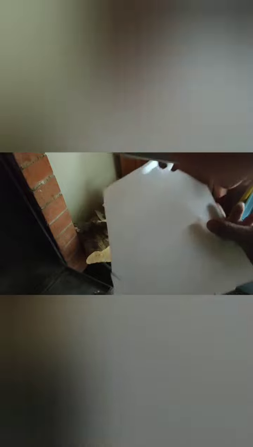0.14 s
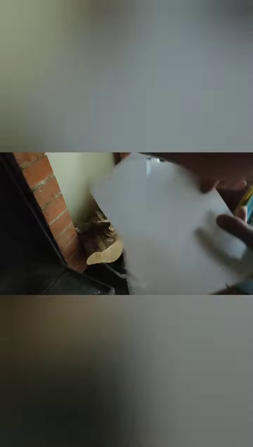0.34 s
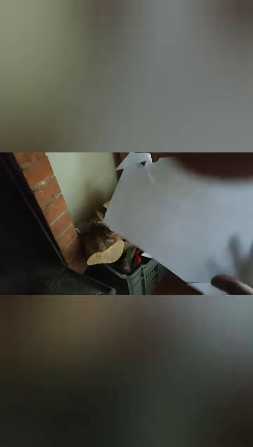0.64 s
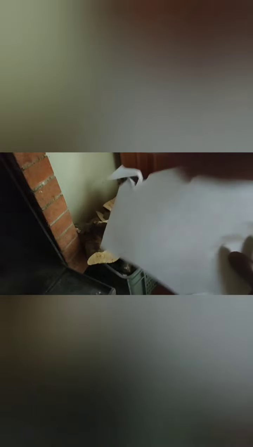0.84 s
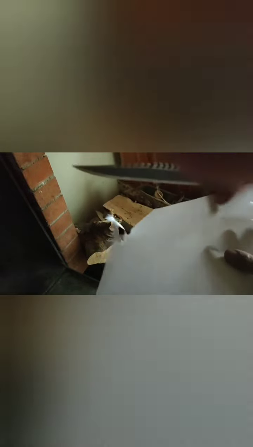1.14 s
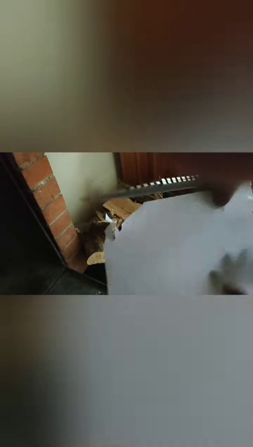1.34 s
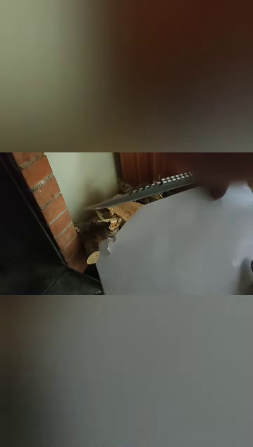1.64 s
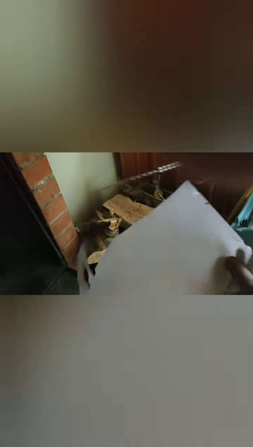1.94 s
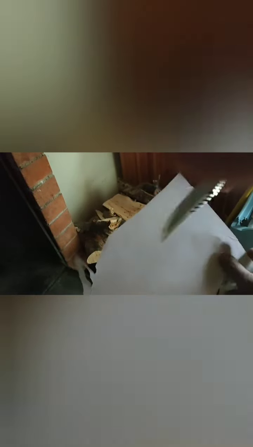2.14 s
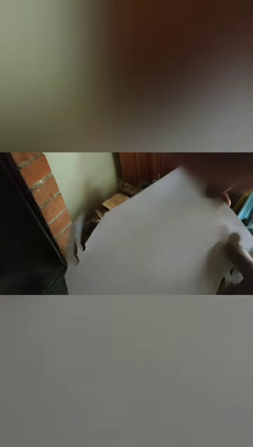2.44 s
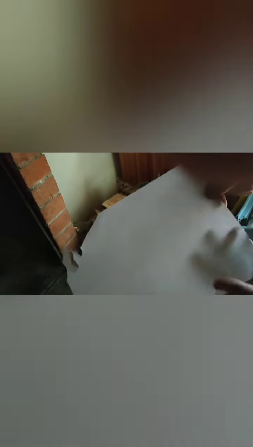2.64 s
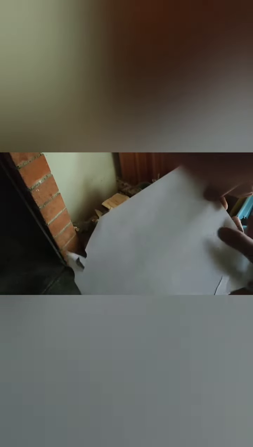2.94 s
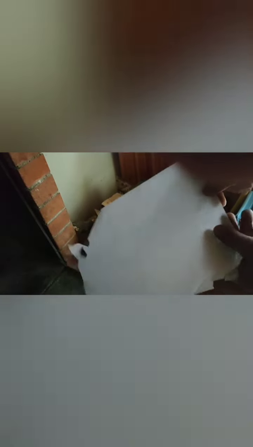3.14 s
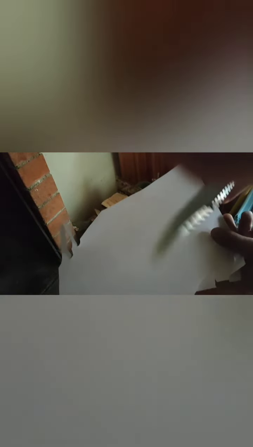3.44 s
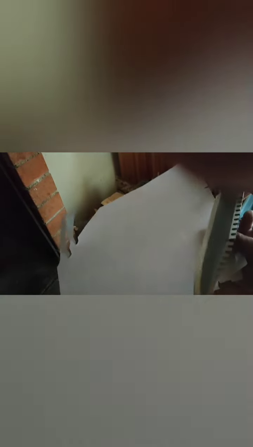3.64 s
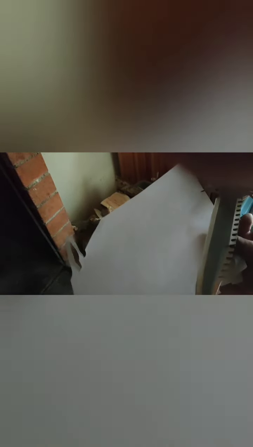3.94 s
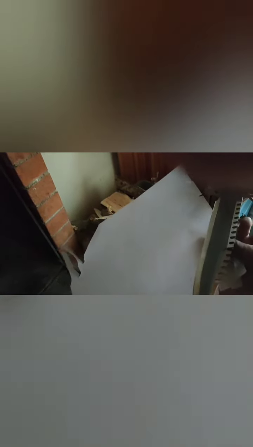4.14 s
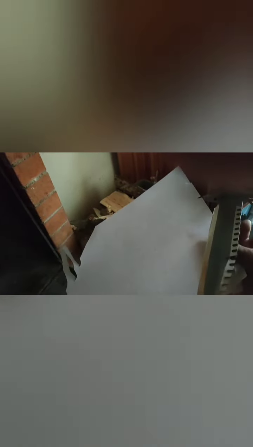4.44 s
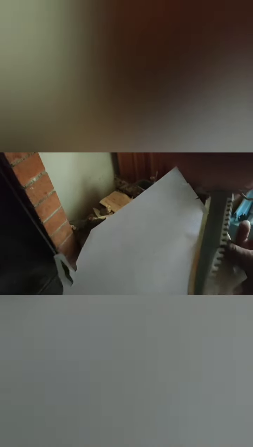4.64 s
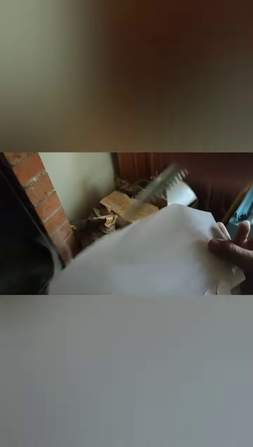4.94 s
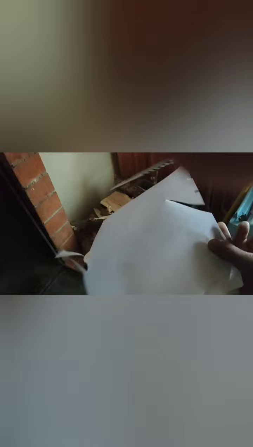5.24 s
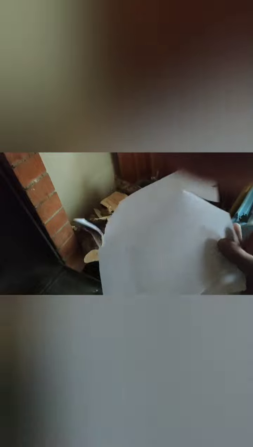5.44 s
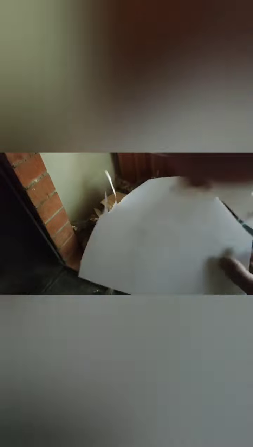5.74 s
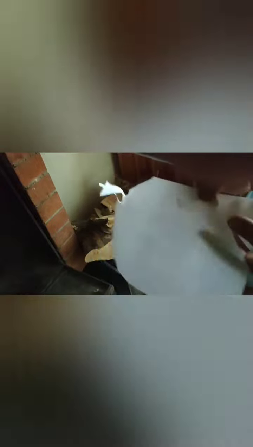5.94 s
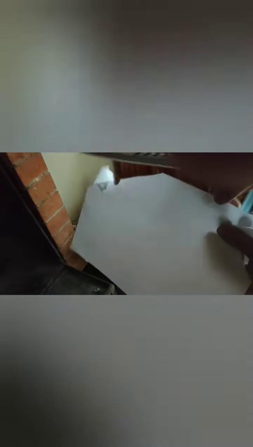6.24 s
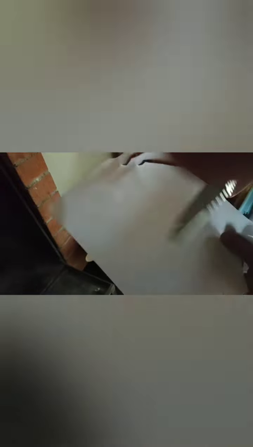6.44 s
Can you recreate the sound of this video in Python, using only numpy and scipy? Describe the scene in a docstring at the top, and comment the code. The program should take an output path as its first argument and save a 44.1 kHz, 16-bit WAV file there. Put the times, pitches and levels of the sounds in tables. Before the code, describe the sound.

Paper handled very near two microphones, with short hard-walled room reflections. Irregular dry rustling and popping creases come first, one pair of pops clearly louder. Handling thins out to tiny ticks and a faint steel-on-paper hiss. A knife then bites and tears through for under half a second, bright and gritty over a fluttering flap. After a light lull, rustling swells into violent cracking snaps.

```python
"""A small brick room: a knife works at the edge of a hand-held sheet of paper, close to two microphones.
Bent, the sheet crackles and ticks; slipping, it hisses: both are coloured random clicks.
Creases snap as resonant pulses with a noisy rattle; crumpling parts are brief clouds of clicks.
The blade glides in a thin hiss; one long slice tears fibres in a swelling rasp over a ringing flap.
At the end the blade catches and jerks the sheet: a cluster of loud snaps."""
import sys
import numpy as np
from scipy import signal
from scipy.fft import rfft, irfft, next_fast_len
from scipy.io import wavfile

SR = 44100
rng = np.random.default_rng(int(sys.argv[2]) if len(sys.argv) > 2 else 0)


def write(x):
    x = np.atleast_2d(x).T
    wavfile.write(sys.argv[1], SR, np.round(np.clip(x, -1, 1) * 32767).astype(np.int16))


N = 290178
TIME = np.arange(N) / SR
PATCHES = 4  # parts of the sheet that radiate separately


def from_db(db):
    """Decibels to gain."""
    return np.exp(np.asarray(db) * (np.log(10) / 20))


def rms_one(x):
    """Scale to unit rms."""
    return x / np.sqrt(np.mean(x ** 2) + 1e-20)


def on_bins(points, size):
    """Read a table over log frequency at the FFT bins of a signal of this size."""
    hz, value = np.transpose(points)
    bins_hz = np.fft.rfftfreq(size, 1 / SR)
    return np.interp(np.log(bins_hz + 1), np.log(hz), value)


def coloured(x, colour):
    """Filter by a table of spectral gains; rms 1."""
    size = next_fast_len(N, True)
    gain = from_db(on_bins(colour, size)).astype(np.float32)
    spectrum = rfft(x.astype(np.float32), size) * gain
    return rms_one(irfft(spectrum, size)[..., :N])


def drift(rate_hz):
    """Smooth random curve with rate_hz new values a second; rms 1."""
    steps = rng.standard_normal(8192)
    return rms_one(np.interp(TIME * rate_hz, np.arange(len(steps)), steps))


def grains(per_s, spread_db):
    """Random clicks, per_s over the whole sheet, most weak and a few strong; rms 1."""
    chance, size = rng.random((2, PATCHES, N), dtype=np.float32)
    born = chance < per_s / SR / PATCHES
    size = 2 * size[born] - 1
    out = np.zeros((PATCHES, N), np.float32)
    out[born] = np.sign(size) * from_db(-spread_db * np.log(np.abs(size) + .02))
    return rms_one(out)


def resonator(w, damping):
    """Band-pass coefficients for a resonance at w rad/sample."""
    a = np.sin(w) * damping / 2
    return [a, 0, -a], [1 + a, -2 * np.cos(w), 1 - a]


def panel(x, hz, damping, body, reach):
    """Patch of paper: one damped resonance minus the push of the whole sheet, dull above reach * hz."""
    patch = signal.lfilter(*resonator(2 * np.pi * min(hz, SR / 4) / SR, damping), x)
    sheet = signal.lfilter(*signal.butter(2, [125, 500], "band", fs=SR), x)
    return signal.lfilter(*signal.butter(2, min(reach * hz, SR / 3), fs=SR), patch - body * sheet)


def add(out, s, sound):
    """Mix a short sound in from time s."""
    at = int(np.clip(round(s * SR), 0, N - 1))
    out[at:at + len(sound)] += sound[:N - at]


ATTACK_S, RELEASE_DB_PER_S = 0.001, 377.5


def swell(start_s, rise_s, fall_s, peak_db, swell_db, hold_s=0):
    """Gain of one movement: quick attack, swell_db up to the peak, hold, as much down, release."""
    t = TIME - start_s
    turns_s = np.cumsum(np.abs([0, rise_s, hold_s, fall_s]))
    db = np.interp(t, turns_s, [-swell_db, 0, 0, -swell_db])
    db = db - RELEASE_DB_PER_S * np.clip(t - turns_s[-1], 0, 1)
    return from_db(peak_db + db) * np.clip(t / ATTACK_S, 0, 1)


# still room: f/Hz, gain/dB
HUSH_COLOUR = [(25, -2), (60, 0), (170, 3), (350, 0), (1000, -8), (3000, -13), (6500, -16), (8000, -25),
               (15000, -30)]
HUSH_DB = -85


def hush():
    """Still room: faint coloured noise, independent at each microphone."""
    return from_db(HUSH_DB) * coloured(rng.standard_normal((2, N)), HUSH_COLOUR)


TICKS_PER_S, TICK_HZ, TICK_DB = 260, 1626, -5  # total rate, middle pitch, level re crackle
TICK_SIZES, TICK_OCTAVES = 5, 0.97  # pitches span +-TICK_OCTAVES


def ticks():
    """Small creases of several sizes flip at random, each exciting a panel resonance; rms 1."""
    total = 0
    for hz in TICK_HZ * 2 ** (TICK_OCTAVES * np.linspace(-1, 1, TICK_SIZES)):
        flips = grains(TICKS_PER_S / TICK_SIZES, spread_db=1.0) + 1e-18  # offset avoids denormals
        total = total + rms_one(panel(flips, hz, damping=0.36, body=0.087, reach=1.9))
    return rms_one(total)


GRIP_FROM_S = .285  # from here the gripping fingers keep the sheet faintly astir

# sheet bent or turned: start t/s, rise/s, fall/s, peak level/dB before trim, swell/dB (negative: dip)
BENDS = [(0, 0.014, 0.048, -62, -9), (0.287, 0.1, 0.2, -52, 9), (0.723, 0.17, 0.22, -48.5, 14.5),
         (1.197, 0.037, 0.34, -59, 2.5), (1.629, 0.19, 0.048, -42, 17), (1.887, 0.049, 0.19, -48, 18.5),
         (2.11, 0.0065, 0.19, -65.5, 10), (2.48, 0.1, 0.18, -51.5, 16), (2.67, 0.087, 0.053, -57, 14),
         (2.973, 0.25, 0.2, -56.5, 6.5), (3.64, 0.016, .04, -81, -3), (3.772, 0.033, 0.1, -75, 7),
         (3.97, 0.13, 0.15, -72.5, 13), (4.3, 0.156, 0.21, -79, 6), (5.08, .01, 0.15, -71, 4),
         (5.236, 0.038, 0.076, -60, 13), (5.37, 0.14, 0.11, -78.5, 0), (5.729, 0.08, 0.023, -59.5, 4.5),
         (5.86, 0.424, 0.074, -45.5, 29), (6.409, 0.084, 0.062, -39, 8)]
# bending fibres: f/Hz, gain/dB
FLEX_COLOUR = [(30, -37), (70, -8.5), (140, 1), (220, 1.5), (350, 1), (600, -0.5), (1000, 0), (2000, -5),
               (3200, -6.5), (5000, -13), (8000, -26.5), (15000, -44)]
BEND_TRIM_DB, GRIP_CRACKLE_DB, CLUMP_DB = -1.94, -90.94, 2.5


def bending(stick_slip):
    """Bending fibres crackle in clumps, and small creases tick."""
    effort = from_db(BEND_TRIM_DB) * sum(swell(*row) for row in BENDS)
    effort = effort + from_db(GRIP_CRACKLE_DB) * (TIME > GRIP_FROM_S)
    clicks = grains(per_s=1400, spread_db=4.5) * from_db(CLUMP_DB * stick_slip)
    return effort * (coloured(clicks, FLEX_COLOUR) + from_db(TICK_DB) * ticks())


# slips in the fingers or along the blade: start t/s, rise/s, fall/s, peak level/dB before trim,
# swell/dB (negative: dip)
SLIPS = [(0, 0.0032, 0.024, -57.5, -1.5), (0.283, 0.19, 0.045, -50.5, 8.5), (.6, 0.0177, 0.17, -89, -1),
         (.72, 0.19, 0.032, -57, 13.5), (.95, 0.097, 0.037, -59, 18), (1.15, 0.26, 0.18, -49.5, 23.5),
         (1.602, 0.22, 0.39, -48, 27.5), (2.09, 0.2, 0.053, -60.5, 14), (2.483, 0.058, 0.13, -58, 13),
         (2.65, 0.13, 0.031, -66, 11.5), (2.86, 0.16, 0.22, -62, 23.5), (3.11, .14, 0.067, -57.5, 23),
         (3.355, 0.0074, 0.062, -58, 7.5), (3.645, 0.009, 0.031, -73, 6), (3.772, 0.11, .008, -77.5, 0),
         (5.089, 0.075, .008, -54, 9), (5.26, 0.035, 0.034, -67.5, 6), (5.37, .01, 0.17, -71, 4),
         (5.515, 0.048, 0.22, -66.5, 3.5), (5.73, 0.086, 0.024, -52, 14), (5.87, 0.1, 0.86, -58, 8.5),
         (6.21, 0.054, 0.021, -47, 13.5), (6.285, 0.0084, 0.012, -30, 20), (6.45, 0.031, 0.02, -41.5, 10)]
# slip hiss: f/Hz, gain/dB
SLIDE_COLOUR = [(200, -15.5), (900, -9.5), (2500, -1), (4000, -2.5), (6500, -6), (8000, -15), (11000, -14),
                (13000, -21), (15500, -21)]
SLIP_TRIM_DB, GRIP_HISS_DB, STICK_DB = 1.0, -88, 1.5


def slipping(stick_slip):
    """Sliding paper sticks and slips in dense small clicks: a hiss."""
    speed = from_db(SLIP_TRIM_DB) * sum(swell(*row) for row in SLIPS)
    speed = speed + from_db(GRIP_HISS_DB) * (TIME > GRIP_FROM_S)
    clicks = grains(per_s=5600, spread_db=1.5) * from_db(STICK_DB * stick_slip)
    return speed * coloured(clicks, SLIDE_COLOUR)


def handling():
    """Bending and slipping share one random unevenness."""
    stick_slip = drift(140)
    return bending(stick_slip) + slipping(stick_slip)


# main creases popping over: t/s, peak level/dB before trim, f/Hz, rattle level/dB re peak before trim
SNAPS = [(.0565, -37, 3930, -22), (.0594, -38, 2040, -26), (.0785, -36.5, 1040, -1.5),
         (.3258, -29, 2100, -3), (.3298, -31, 1900, -5), (.371, -28.5, 2150, -7), (.4729, -23.5, 2200, -8),
         (.5405, -34.5, 1600, -5), (.561, -45.5, 1450, 1), (.7249, -37.5, 2050, -22),
         (.8775, -29.5, 1180, -8.5), (.887, -27.5, 2100, -5), (1.042, -31, 1115, -16),
         (1.086, -40, 2400, -12.5), (1.2065, -32.5, 1430, -9.5), (1.227, -38, 2170, -3.5),
         (1.4072, -44, 1060, -12), (1.5296, -31, 1910, -12.5), (1.7037, -28.5, 2060, -17),
         (1.7352, -35.5, 2330, 0), (1.7682, -21.5, 1680, -15), (1.7859, -10.5, 1950, -15),
         (1.8012, -20.5, 1490, -5), (1.8976, -27, 1100, -8.5), (1.9476, -31, 1510, -5.5),
         (2.0732, -12.5, 2000, -36), (2.5271, -32.5, 1730, -9), (2.5828, -21, 2230, -8.5),
         (2.7635, -37, 2600, -13), (2.9949, -36, 1430, -10.5), (3.073, -36, 2400, -13),
         (3.095, -42, 880, -5.5), (3.1318, -40, 4000, -27), (3.137, -43, 3420, 1),
         (3.151, -30.5, 1700, -6.5), (3.2098, -19, 1570, -7.5), (3.3751, -30, 4500, -12),
         (3.4139, -33.5, 2410, -21), (3.456, -44, 3000, -18), (3.849, -53.5, 3100, -2.5),
         (3.9776, -50, 1340, -11), (4.088, -33.5, 1250, -11), (4.5998, -44, 1384, -4.5),
         (5.248, -53, 1220, -20), (5.265, -38, 1590, -4), (5.3755, -47, 5270, -2.5),
         (5.3784, -38, 2020, -6), (6.1125, -39, 1200, -3), (6.1503, -32, 1130, -6.5),
         (6.1765, -33, 1100, -10), (6.185, -27.5, 1740, -7.5), (6.2155, -32, 1040, -6.5),
         (6.222, -30.5, 2420, -7.5), (6.2359, -28, 1430, -10), (6.26, -31, 2300, -15),
         (6.279, -16, 1860, 0), (6.2885, -7, 3220, -13), (6.29, -3, 2420, -9.5), (6.295, -20.5, 1970, -1),
         (6.34, -21, 1460, -5), (6.372, -37, 2100, -16), (6.4078, -37, 5600, -13), (6.41, -4.5, 2120, -11),
         (6.4157, -3.5, 1930, -13.5), (6.4865, -14, 1660, -9), (6.495, -14, 2330, -3.5),
         (6.4975, -11.5, 2070, -11)]
SNAP_TRIM_DB, RATTLE_TRIM_DB = -2.5, 3.5
GIVE_S, RATTLE_S = .0003, .002  # time constants of creak and rattle


def snaps(size=2048):
    """A crease creaks, flips with one sharp pulse in one patch, and rattles in all patches."""
    out = np.zeros((PATCHES, N))
    lead = size // 8
    t = TIME[:size] - TIME[lead]
    shape = np.exp(-np.abs(t) / np.where(t < 0, GIVE_S, RATTLE_S)) / np.sqrt(PATCHES)
    for k, (s, db, hz, after_db) in enumerate(SNAPS):
        peak_db = db + SNAP_TRIM_DB
        # push and, a quarter period later, pull
        flip = signal.unit_impulse(size, lead) - signal.unit_impulse(size, lead + int(SR / hz / 4))
        pulse = panel(flip, hz, damping=3.0, body=3.9, reach=1.57)
        add(out[k % PATCHES], s + t[0], from_db(peak_db) * pulse / np.abs(pulse).max())
        noise = rng.standard_normal((PATCHES, size))
        rattles = rms_one(panel(noise, hz, damping=0.87, body=0.17, reach=2.3))
        for patch, rattle in zip(out, rattles):
            add(patch, s + t[0], from_db(peak_db + after_db + RATTLE_TRIM_DB) * shape * rattle)
    return out


# parts of the sheet crumpling: middle t/s, level/dB before trim, f/Hz, half length/s before scaling
BUCKLES = [(.082, -48.5, 755, 0.0059), (.104, -62, 900, .006), (.134, -58, 850, 0.0052),
           (.385, -44, 1700, 0.03), (.881, -37, 1400, 0.014), (.885, -53, 170, 0.023),
           (.998, -43, 1420, 0.0083), (1.044, -43, 1256, 0.019), (1.085, -49, 1700, 0.0075),
           (1.222, -49, 1400, 0.017), (1.26, -49, 1380, 0.023), (1.404, -39.5, 867, 0.0026),
           (1.474, -46.5, 2600, 0.02), (1.8, -36, 1600, 0.0071), (1.805, -49, 191, 0.023),
           (1.902, -43, 980, 0.0068), (2.029, -44, 1910, 0.0066), (2.255, -56.5, 1920, 0.0095),
           (2.322, -59, 1920, 0.0084), (2.415, -78, 706, 0.0065), (2.562, -47.5, 2600, 0.0061),
           (2.595, -44, 1900, 0.01), (2.68, -47.5, 1300, 0.011), (2.728, -46, 990, 0.0061),
           (3.155, -42.5, 1470, 0.0065), (3.236, -40.5, 1230, 0.0048), (3.303, -51, 1305, 0.013),
           (3.331, -57, 1390, 0.0044), (3.374, -63, 6500, 0.016), (3.657, -56.5, 2210, 0.0077),
           (3.788, -61.5, 1500, 0.02), (3.857, -62, 2550, 0.004), (3.9, -62, 2790, 0.0063),
           (4.095, -63.5, 456, 0.0089), (4.258, -70, 1900, 0.018), (4.604, -58.5, 330, 0.0088),
           (4.855, -33, 2300, .012), (4.94, -35, 4300, 0.0088), (4.986, -31, 2800, 0.0021),
           (5.534, -50, 1940, 0.0098), (6.068, -51, 910, 0.0071), (6.117, -45.5, 1130, 0.0064),
           (6.168, -46.5, 1300, 0.011), (6.335, -31.5, 1350, 0.036), (6.438, -36, 1180, 0.026),
           (6.486, -26, 1550, 0.0075), (6.505, -37, 1700, 0.0047)]
BUCKLE_TRIM_DB, LENGTH_SCALE, JERK_DB, FACET_OCTAVES = -2.5, 0.66, 2.0, 0.41


def buckles():
    """A crumple is a swelling, fading, jerky cloud of clicks; each patch folds at its own pitch."""
    out = np.zeros((PATCHES, N))
    clicks = grains(per_s=6500, spread_db=2.5) * from_db(JERK_DB * drift(260))
    ratios = 2 ** (FACET_OCTAVES * np.linspace(-1, 1, PATCHES))
    for s, db, hz, half_s in BUCKLES:
        near = slice(max(0, int((s - .08) * SR)), int((s + .08) * SR))
        shape = 1 / np.cosh(np.clip((TIME[near] - s) / (LENGTH_SCALE * half_s), -20, 20))
        facets = []
        for x, ratio in zip(clicks, ratios):
            facet = panel(x[near], hz * ratio, damping=0.87, body=0.22, reach=2.28)
            facets.append(facet / np.sqrt(ratio))
        out[:, near] += from_db(db + BUCKLE_TRIM_DB) * shape * rms_one(np.array(facets))
    return out / np.sqrt(PATCHES)


# edge gliding on the taut sheet without biting: start t/s, rise/s, fall/s, peak level/dB, swell/dB
GLIDES = [(3.9, .19, 0.14, -68, 12.5), (4.28, 0.11, 0.49, -64.5, 34)]
# steel on paper edge: f/Hz, gain/dB
GLIDE_COLOUR = [(150, -4.5), (400, -11), (1000, -7), (2500, -4), (4200, 0), (5400, 2), (6800, -7),
                (8000, -21.5), (11500, -16.5), (15000, -27)]


def gliding():
    """Smooth steel on the paper's edge: a thin, even hiss of dense clicks."""
    clicks = grains(per_s=6700, spread_db=0.5)
    return sum(swell(*row) for row in GLIDES) * coloured(clicks, GLIDE_COLOUR)


BITE_S = 4.615  # the edge bites and the long slice starts
FLAP_HZ, FLAP_OCTAVES_PER_S, FLAP_DAMPING = 6400, 3.1, 0.33  # pitch at the bite, its fall


def flap_ring(x, size=256):
    """The flap's broad resonance sinks as the cut lengthens; rms 1."""
    out, state = np.zeros(x.shape), np.zeros((PATCHES, 2))
    for i in range(0, N, size):
        hz = FLAP_HZ * 2 ** (-FLAP_OCTAVES_PER_S * np.clip(TIME[i] - BITE_S, 0, 1))
        b, a = resonator(2 * np.pi * hz / SR, FLAP_DAMPING)
        out[:, i:i + size], state = signal.lfilter(b, a, x[:, i:i + size], zi=state)
    return rms_one(out)


# tearing fibres: f/Hz, gain/dB
TEAR_COLOUR = [(100, -51), (400, -15), (680, -14), (1050, -0.5), (1500, -3.5), (2200, 1.5), (3100, -5.5),
               (4500, -7), (6500, -22.5), (8000, -48), (15000, -52)]
# blade friction: f/Hz, gain/dB
RUB_COLOUR = [(800, -65), (3500, 14), (5000, 7.5), (7000, 5.5), (8000, -24), (10500, -5.5), (12000, -27),
              (15000, -12)]
# shuddering flap: f/Hz, gain/dB
SHUDDER_COLOUR = [(25, -30), (70, -13), (150, 2.5), (250, -1), (340, 6), (480, 6), (800, 8), (1500, -14)]
FLAP_DB, CATCH_DB, SNAG_DB, SINK_IN_S = -2.5, 1.5, 0.26, 0.029  # FLAP_DB re tearing


def slicing():
    """Fibres break unevenly, the blade sinks in and rubs, the flap rings and shudders: (edge, flap)."""
    # friction peaks first, then tearing, last the freed flap
    rub = swell(BITE_S, rise_s=0.225, fall_s=.14, peak_db=-37.5, swell_db=28, hold_s=0.135)
    tear = swell(BITE_S, rise_s=0.265, fall_s=0.13, peak_db=-30.2, swell_db=37, hold_s=0.1)
    shudder = swell(BITE_S, rise_s=.32, fall_s=.13, peak_db=-39.5, swell_db=31, hold_s=.06)
    catching = from_db(CATCH_DB * drift(320) + SNAG_DB * drift(70))
    breaks = grains(per_s=3200, spread_db=1.2) * catching
    friction = grains(per_s=20000, spread_db=4.0) * catching
    fibres = tear * (coloured(breaks, TEAR_COLOUR) + from_db(FLAP_DB) * flap_ring(friction))
    sink_in = np.clip((TIME - BITE_S) / SINK_IN_S, 0, 1)
    blade = rub * sink_in * coloured(friction, RUB_COLOUR)
    return fibres + blade, shudder * coloured(friction, SHUDDER_COLOUR)


# likeness of the echo at the two microphones: f/Hz, likeness/0-1
ECHO_LIKENESS = [(100, 0.92), (350, 0.8), (700, 0.43), (1500, 0.088), (4000, 0.061), (15000, 0)]


def echoes(t60_s, low_t60_s, size=32768):
    """Dense decaying reflections at two microphones, alike and longer in the bass; spectra."""
    t = TIME[:size]
    noise = rng.standard_normal((2, size))
    low = signal.sosfilt(signal.butter(2, 450, fs=SR, output="sos"), noise)
    tail = (noise - low) * from_db(-60 * t / t60_s) + low * from_db(-60 * t / low_t60_s)
    tail = tail * (t > .001)
    mid, side = rfft(rms_one(tail) / np.sqrt(size))
    alike = np.clip(on_bins(ECHO_LIKENESS, size), -1, 1)
    return (np.sqrt(1 + alike) * mid + np.sqrt(1 - alike) * side * [[1], [-1]]) / np.sqrt(2)


# echo colour: f/Hz, gain/dB
ROOM_COLOUR = [(50, 3.5), (110, -3.5), (165, 2), (280, 0.5), (345, 3), (430, -3), (520, -1.5), (660, 3.5),
               (1000, 4), (3000, 3), (7000, 4), (15000, -11.5)]
# resonances of the corner between the brick walls: f/Hz, level/dB, width/Hz
ROOM_MODES = [(155, 5.5, 25), (234, 6.5, 48), (342, 8, 28.4), (507.3, 4, 33), (800, 3.5, 43), (997, 4, 30),
              (1181, 2.5, 31), (1760, -13.5, 270)]
NEAR_DB, FAR_DB = -5.0, -7.0  # before ROOM_COLOUR


def room(lag_s, polarity, size=32768):
    """Left lags right; hands and sheet echo briefly, walls longer, the corner rings: (direct, echo)."""
    hz = np.fft.rfftfreq(size, 1 / SR)
    direct = np.exp(-2j * np.pi * hz * np.array([[lag_s], [0]]))
    near = from_db(NEAR_DB) * echoes(t60_s=0.062, low_t60_s=0.14)
    far = from_db(FAR_DB) * echoes(t60_s=0.15, low_t60_s=0.35)
    ringing = 0
    for mode_hz, db, width_hz in ROOM_MODES:
        loss = 1j * hz * width_hz
        ringing = ringing + from_db(db) * loss / (mode_hz ** 2 - hz ** 2 + loss)
    return direct, (near + far) * from_db(on_bins(ROOM_COLOUR, size)) + polarity * ringing


def lean(db):
    """Gains of the two microphones for a sound db louder on the left."""
    return from_db(db * np.array([[.5], [-.5]]))


# microphone balance: f/Hz, left minus right level/dB
BALANCE = [(100, -.7), (520, -2.4), (650, 0.5), (900, 2.1), (1030, 5.8), (1350, 5.95), (1900, 2.9),
           (3000, 5.46), (3600, 4.3), (4400, 1), (6300, -1.3), (8300, 2.2), (15000, 0.94)]


def heard(x, paths, size=32768):
    """Convolve a sound with its paths to the two microphones, each with its own colour."""
    lead = size // 256  # room for the filter's pre-ringing
    response = np.roll(irfft(paths * lean(on_bins(BALANCE, size))), lead, axis=1)
    wet = signal.fftconvolve(x[None].astype(np.float32), response.astype(np.float32), axes=1)
    return wet[:, lead:lead + N]


LEAST_LAG_S, MOST_LAG_S, EDGE_LAG_S = .00005, 0.00019, .00009  # delay of the left microphone
EDGE_LEAN_DB, EDGE_LEAN_FALL_DB_PER_S = 6, 14.5  # the cut starts on the left and moves past the middle
SNAP_LEAN_DB, SNAP_ECHO_DB = 1.0, -5.5  # snaps lie further left; echo re that of a rustle


def scene():
    """Each patch of the wide sheet reaches the microphones by its own paths, over the hush."""
    out = hush()
    edge, flap = np.array(slicing()) / np.sqrt(PATCHES)
    rustle = (handling() + gliding()) / np.sqrt(PATCHES) + flap + buckles()
    cracks = snaps()
    cut_s = np.clip(TIME - BITE_S, 0, .5)
    travel = lean(EDGE_LEAN_DB - EDGE_LEAN_FALL_DB_PER_S * cut_s)
    for k, lag_s in enumerate(np.linspace(LEAST_LAG_S, MOST_LAG_S, PATCHES)):
        polarity = (-1) ** k
        direct, echo = room(lag_s, polarity)
        out = out + heard(rustle[k], direct + echo)
        # a flipping crease beams at the microphones and stirs the room less
        out = out + lean(SNAP_LEAN_DB) * heard(cracks[k], direct + from_db(SNAP_ECHO_DB) * echo)
        # tearing comes from one point, under the blade
        out = out + travel * heard(edge[k], sum(room(EDGE_LAG_S, polarity)))
    return out


LOW_CUT_HZ, CUTOFF_HZ, CEILING = 45, 15500, .85


def record(dry):
    """The microphones lose deep bass; the highest peaks are rounded softly and the top is cut steeply."""
    thin = signal.sosfilt(signal.butter(1, LOW_CUT_HZ, "high", fs=SR, output="sos"), dry)
    rounded = CEILING * np.tanh(thin / CEILING)
    return signal.sosfilt(signal.ellip(10, .2, 80, CUTOFF_HZ, fs=SR, output="sos"), rounded)


dry = scene()
out = record(dry)
write(out)
```